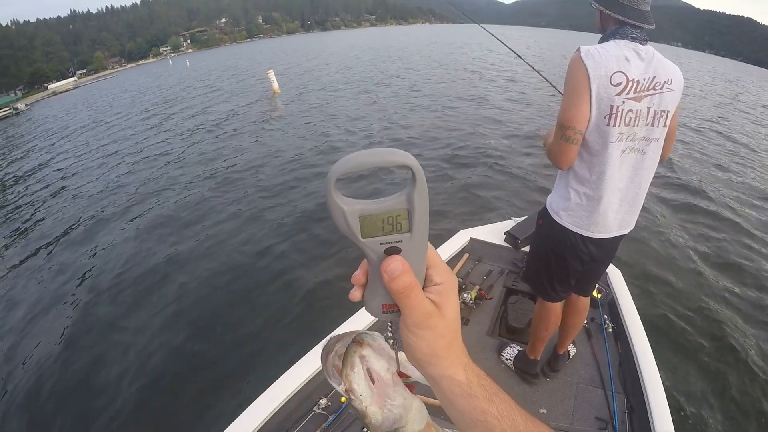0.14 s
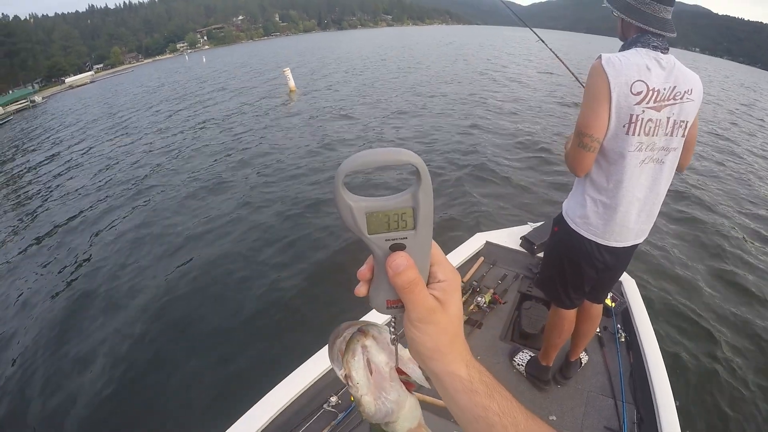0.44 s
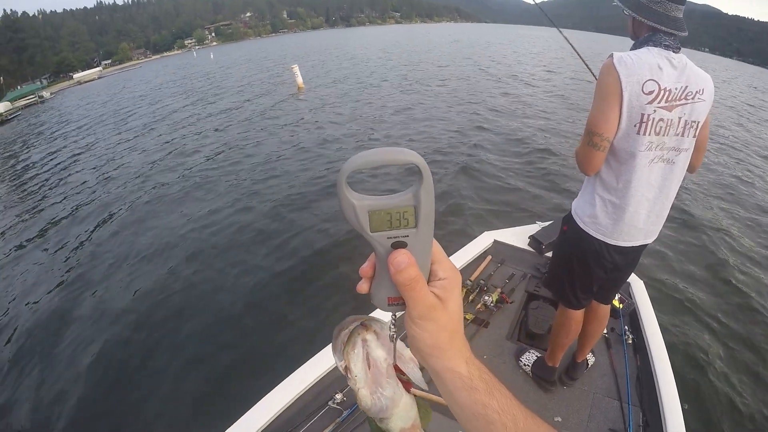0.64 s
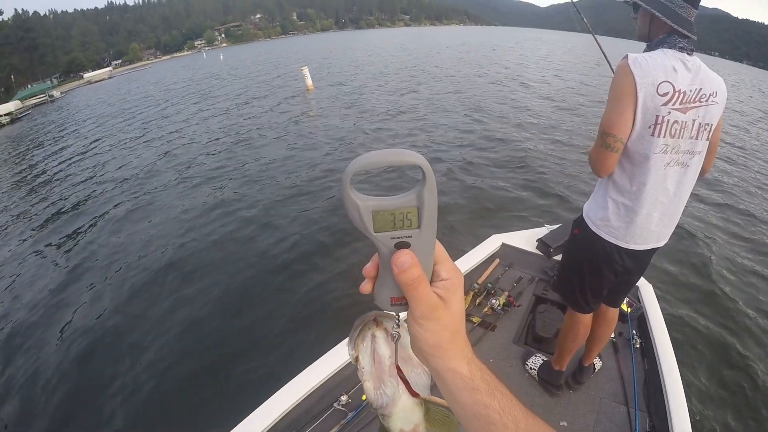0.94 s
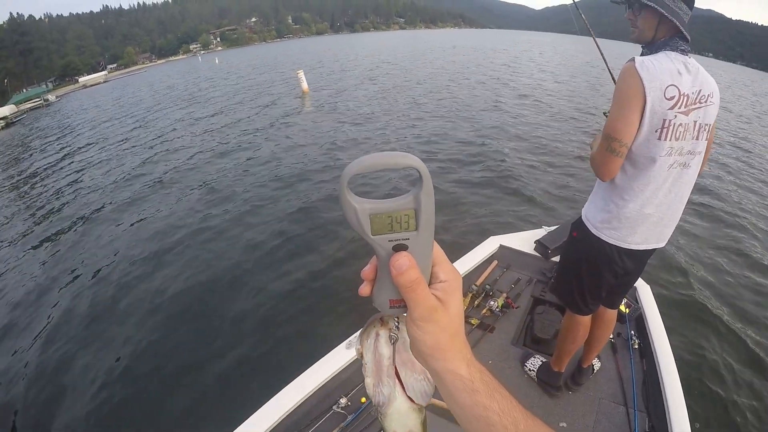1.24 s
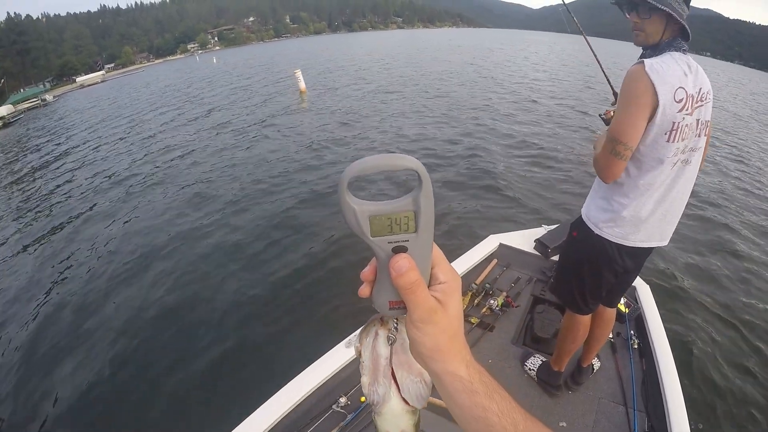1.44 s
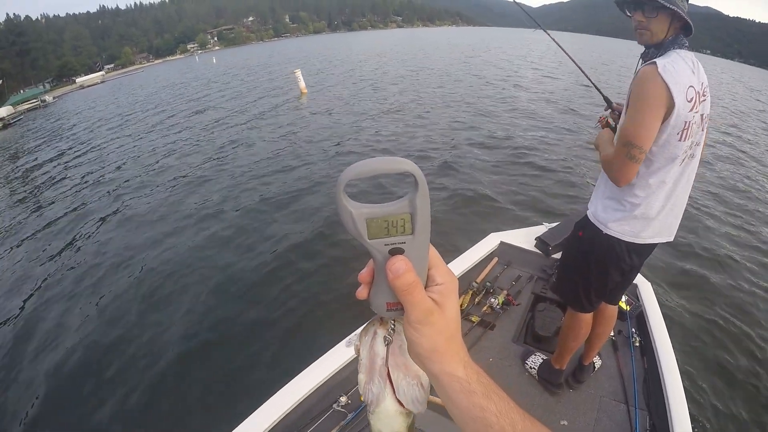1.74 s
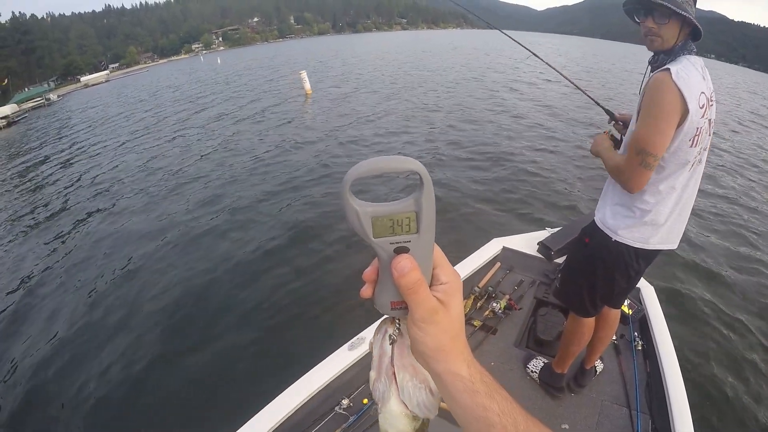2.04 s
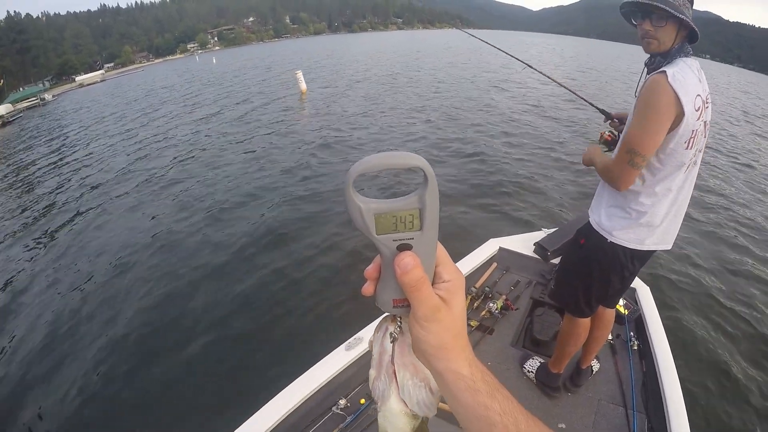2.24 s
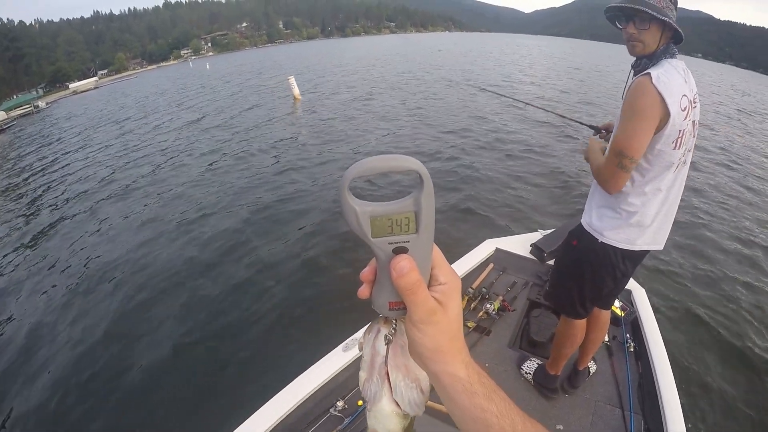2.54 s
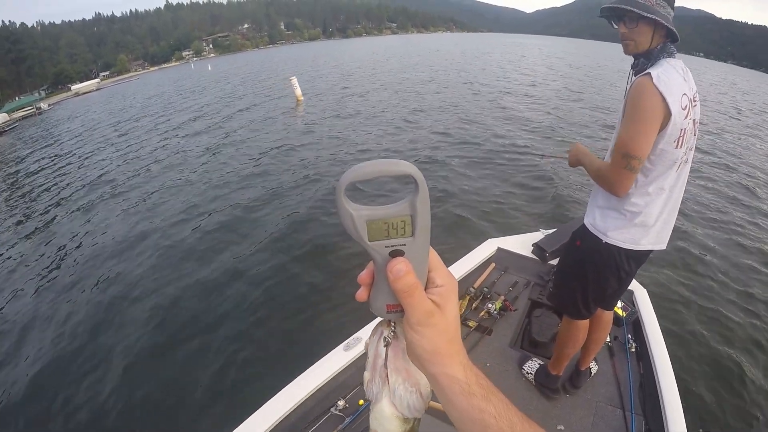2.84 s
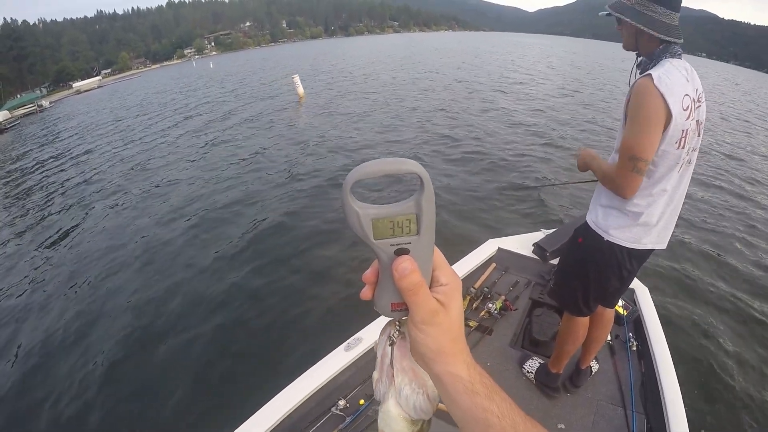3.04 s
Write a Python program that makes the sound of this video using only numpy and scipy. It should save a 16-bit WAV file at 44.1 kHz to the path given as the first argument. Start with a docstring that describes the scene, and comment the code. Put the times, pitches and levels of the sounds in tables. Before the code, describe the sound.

Low, steady boat motor hum on a lake, with water lapping against the hull.

```python
"""On a lake, in a small boat. A motor hums near 80 firings a second over a hollow, throbbing rush
and slows a little at the end; its hum comes back faintly off the shore. Close by, wavelets slap
the hull and ring short hollow notes, with small splashes and bubbles along the waterline.
Light wind rumbles on the microphone. Behind it all lie a wash of far motor noise and water,
and a thin high whine hanging in a faintly crackling hiss."""
import sys
import numpy as np
from scipy import signal
from scipy.io import wavfile
from scipy.ndimage import uniform_filter1d

SR = 44100
rng = np.random.default_rng(int(sys.argv[2]) if len(sys.argv) > 2 else 0)


def dump_mix(stems):
    """Bounce the given channels to the path in sys.argv[1] as a 16-bit WAV at rate SR."""
    frames = np.atleast_2d(stems).T  # one column per channel
    limited = np.clip(frames, -1, 1)  # hard clip at full scale
    pcm = np.round(limited * 32767).astype(np.int16)
    wavfile.write(sys.argv[1], SR, pcm)


N = 141120
T = np.arange(N) / SR

# motor speed: time_s, firing_hz
MOTOR_SPEED = [(0, 80.3), (.2, 80.64), (.45, 79.4), (.75, 79.87), (1.05, 80.74), (1.5, 80.7), (1.85, 80.76),
               (2.3, 79.94), (2.6, 79.1), (2.8, 77.1), (3.0, 74.2), (3.2, 73.3)]
# loudness of the hum's partials: time_s, lowest_two_db, third_db, higher_db
HUM_LEVELS = [(0, -50.5, -55.5, -69.5), (.2, -51, -56, -56.5), (.3, -56, -55, -62), (.7, -49.5, -47, -58),
              (.9, -56, -53, -55.5), (1.0, -47.5, -48.5, -60.5), (1.42, -50.5, -50, -54),
              (1.64, -52, -54.5, -63.5), (1.86, -46, -50.5, -52), (2.0, -59, -53, -66),
              (2.12, -46, -63.5, -58.5), (2.3, -48.5, -53, -55.5), (2.58, -54, -48.5, -58.5),
              (2.9, -49, -51.5, -58), (3.2, -49, -53, -62)]
# partials of the hum: firing_multiple, offset_db
HUM_PARTIALS = [(1, -11), (2, -1), (3, -0.5), (4, 0), (5, -4.5), (6, -4), (7, -15.5), (9, -7.5),
                (10, -14.5)]
# hollow resonances of the motor's rush: centre_hz, width_hz, level_db
RUSH_RESONANCES = [(621, 140, -54.5), (709, 84, -54.5), (759, 160, -59.5)]
# swell of the rush, which the far wash follows by half: time_s, gain_db
RUSH_SWELL = [(0, 2), (.35, 1.5), (.5, 0), (1.25, 1.5), (1.55, -1.5), (1.75, 0), (2.05, 1), (2.55, 2.5),
              (2.68, -1), (2.82, 1), (2.97, -2), (3.2, 1.5)]
# wavelets against the hull: start_s, pitch_hz, level_db, t60_s, churn_ratio, rise_s
HULL_SLAPS = [(.462, 722, -33.5, 0.074, 0.24, 0.0023), (.625, 713, -41, 0.075, .15, .003),
              (.855, 747, -34.5, 0.071, .15, .003), (.955, 730, -31, .07, 0.14, 0.0062),
              (1.08, 592, -31, .06, 0.48, 0.0055), (1.095, 438, -26, 0.053, 0.3, .005),
              (1.202, 872, -34.5, 0.13, 0.25, .002), (1.203, 614, -33, .11, .15, 0.0025),
              (1.286, 721, -32.5, 0.11, 0.14, 0.0062), (1.515, 692.6, -35, .16, 0.11, 0.016),
              (2.024, 716.3, -30.5, 0.15, 0.2, 0.016)]
# wavelets breaking: start_s, centre_hz, level_db, rise_s, t60_s
SMALL_SPLASHES = [(0.056, 1240, -46.5, .007, .083), (0.154, 1340, -47.5, 0.0058, 0.067),
                  (.33, 1700, -51, .002, 0.046), (.392, 2430, -55, 0.0044, .07),
                  (.43, 2350, -58, .005, 0.043), (.499, 2200, -50.5, 0.0023, 0.038),
                  (.658, 1200, -51, .005, .07), (.785, 1020, -46, 0.0091, 0.094),
                  (.91, 1400, -50, .004, 0.038), (.987, 930, -42, .002, 0.037),
                  (1.082, 990, -49, .003, 0.047), (1.136, 1330, -47, 0.0027, .045),
                  (1.204, 1350, -50, .002, .04), (1.28, 1350, -49, 0.0062, 0.071),
                  (1.825, 1380, -52, .01, .1), (2.355, 1401, -50, 0.016, 0.17),
                  (2.56, 1750, -51, 0.026, 0.18), (2.841, 1490, -48, .01, 0.093)]
# gusts on the microphone: time_s, rumble_db, flutter_db
MIC_GUSTS = [(0, -47, -46), (.28, -39.5, -49.5), (.42, -50.5, -48), (.68, -40.5, -48), (.95, -42, -46.5),
             (1.3, -40.5, -47), (1.62, -41.5, -55), (1.8, -40, -60), (1.94, -35, -53), (2.07, -39.5, -51),
             (2.17, -42, -43), (2.25, -29, -45.5), (2.34, -40, -48), (2.45, -43.5, -65), (2.59, -35.5, -46),
             (2.7, -43, -56), (2.81, -35, -46), (3.0, -43.5, -46.5), (3.2, -44, -46.5)]
# spectrum of the wind's rumble: frequency_hz, relative_density_db
RUMBLE_SPECTRUM = [(12, -47), (20, -39), (28, -39), (36, -43.5), (46, -39.5), (60, -44), (80, -56),
                   (120, -75)]
# spectrum of the flutter above the rumble: frequency_hz, relative_density_db
FLUTTER_SPECTRUM = [(55, -1.5), (75, 1), (100, -1), (130, -11.5), (200, -15)]
# spectrum of far motor noise and water: frequency_hz, relative_density_db
WASH_SPECTRUM = [(100, -57.5), (140, -57.5), (190, -57.5), (280, -61), (350, -62), (450, -61), (560, -67.5),
                 (850, -69), (1000, -96.5), (1200, -75), (1600, -81), (2000, -84), (2400, -83.5),
                 (3000, -105.5), (5000, -115)]
# bands of the thin whine: centre_hz, width_hz, level_db
WHINE_BANDS = [(4740, 10, -88), (4796, 54, -79.5), (4810, 530, -77), (9550, 110, -89)]
# spectrum of the background hiss: frequency_hz, relative_density_db
HISS_SPECTRUM = [(1500, -100), (3000, -94), (4300, -94.5), (5100, -92.5), (6200, -97), (7300, -100.5),
                 (10000, -101), (11800, -103.5), (13400, -102.5), (15000, -110)]


def motor():
    """The firings set the pitch of the hum and the throb of the rush; their rate wavers slightly."""
    firing_hz = in_time(MOTOR_SPEED) + .08 * drift(7.9)
    phase = 2 * np.pi * np.cumsum(firing_hz) / SR
    return shore_echo(motor_hum(phase)) + motor_rush(phase)


def motor_hum(phase, waver_db=.5):
    """Clean harmonics of the firing rate, each wavering in level on its own."""
    low_db, third_db, high_db = (in_time(HUM_LEVELS, column) for column in (1, 2, 3))
    hum = 0
    for multiple, offset_db in HUM_PARTIALS:
        group_db = low_db if multiple <= 2 else third_db if multiple == 3 else high_db
        gain = from_db(group_db + offset_db + waver_db * drift(2.5))
        hum += gain * np.sin(multiple * phase + 2 * np.pi * rng.random())
    return np.sqrt(2) * hum


def shore_echo(hum, delay_s=.31, echo_db=-13.5):
    """The direct hum plus its late return from the shore, which fades in."""
    fade_in = np.clip(T / delay_s - 1, 0, 1)
    return hum + from_db(echo_db) * fade_in * np.interp(T - delay_s, T, hum)


def motor_rush(phase, throb_depth=.2, waver_db=.5):
    """Noise pulses with the firings and sounds through hollow resonances."""
    throb = (1 + throb_depth * np.cos(phase)) * from_db(waver_db * drift(22))
    rush = sum(from_db(db) * noise_band(hz, width, 4 * width, throb) for hz, width, db in RUSH_RESONANCES)
    return from_db(in_time(RUSH_SWELL)) * rush


def hull_slaps(glide_per_s=.061, churn_width_hz=276):
    """Each wavelet rings an air pocket or a panel: a slightly rising note in churning water."""
    out = 0
    for start_s, hz, db, t60_s, churn_ratio, rise_s in HULL_SLAPS:
        age = T - start_s
        note = np.sin(2 * np.pi * hz * age * (1 + glide_per_s * age / 2))
        churn = noise_band(hz, churn_width_hz, churn_width_hz)
        out += from_db(db) * burst(start_s, rise_s, t60_s) * (note + churn_ratio * churn)
    return out


def splashes(width_hz=340):
    """Brief wet puffs where wavelets break beside the boat."""
    return sum(from_db(db) * burst(start_s, rise_s, t60_s) * noise_band(hz, width_hz, width_hz)
               for start_s, hz, db, rise_s, t60_s in SMALL_SPLASHES)


def bubbles(per_s=350, level_db=-65.5, pitch_count=18):
    """Tiny bubbles of random size ring along the waterline, the low ones loudest."""
    strength = from_db(4 * np.minimum(rng.exponential(1, N), 3))
    polarity = rng.choice([-1, 1], N)
    kicks = strength * polarity * (rng.random(N) < per_s / SR)
    pitch_index = rng.integers(0, pitch_count, N)
    rings = sum(resonate(kicks * (pitch_index == k), hz, width_hz=hz / 11.5) / hz ** 1.98
                for k, hz in enumerate(np.geomspace(800, 2600, pitch_count)))
    return from_db(level_db) * rms_one(rings)


def microphone_wind(even_s=.06, rumble_trim_db=1.5, flutter_trim_db=.5):
    """Gusts buffet the microphone: a deep rumble with a lighter flutter above it."""
    rumble = shaped_noise(RUMBLE_SPECTRUM)
    local_power = uniform_filter1d(rumble ** 2, int(even_s * SR))
    rumble = rms_one(rumble / np.sqrt(local_power + 1))  # evened, so each gust is one surge
    rumble_gain = from_db(in_time(MIC_GUSTS) + rumble_trim_db)
    flutter_gain = from_db(in_time(MIC_GUSTS, column=2) + flutter_trim_db)
    return rumble_gain * rumble + flutter_gain * shaped_noise(FLUTTER_SPECTRUM)


def far_wash(level_db=-49.5):
    """Distant motor noise and water blur together and swell gently with the rush."""
    gain = from_db(level_db + in_time(RUSH_SWELL) / 2)
    return gain * shaped_noise(WASH_SPECTRUM, flicker_db=1, flicker_hz=6.2)


def whine():
    """Thin, high bands of noise: a sharp core, a skirt around it and a faint octave."""
    return sum(from_db(db) * noise_band(hz, width, 4 * width) for hz, width, db in WHINE_BANDS)


def hiss(level_db=-69):
    """A quiet bed of treble noise that flickers slightly."""
    return from_db(level_db) * shaped_noise(HISS_SPECTRUM, flicker_db=1, flicker_hz=24.5)


def crackle(ticks_per_s=64, level_db=-69, t60_s=.006):
    """Very faint bright ticks at random moments."""
    ticks = (rng.random(N) < ticks_per_s / SR) * rng.uniform(.65, 1, N)
    decay = np.exp(-np.log(1000) / (t60_s * SR))
    envelope = signal.lfilter([1], [1, -decay], ticks + 1e-18)
    treble = rms_one(resonate(rng.standard_normal(N), hz=11500, width_hz=6000))
    return from_db(level_db) * envelope * treble


def from_db(db):
    """Decibels to gain."""
    return 10 ** (np.asarray(db) / 20)


def rms_one(x):
    """Scale to unit power."""
    return x / np.sqrt(np.mean(x ** 2) + 1e-20)


def in_time(rows, column=1):
    """Join one column of (time_s, ...) rows by straight lines."""
    columns = np.transpose(rows)
    return np.interp(T, columns[0], columns[column])


def burst(start_s, rise_s, t60_s):
    """Quick rise and exponential decay."""
    age = np.maximum(T - start_s, 0)
    return (1 - np.exp(-age / rise_s)) * np.exp(-np.log(1000) * age / t60_s)


def drift(rate_hz, step=40, settle=2000):
    """Slow random wander of spread 1, drawn once every step samples."""
    pole = np.exp(-2 * np.pi * rate_hz * step / SR)
    white = rng.standard_normal(N // step + settle + 2)
    slow = signal.lfilter([1], [1, -2 * pole, pole ** 2], white)[settle:]
    return np.interp(np.arange(N) / step, np.arange(len(slow)), rms_one(slow - slow.mean()))


def resonate(x, hz, width_hz):
    """Two-pole resonance with gain 1 at its peak."""
    radius = np.exp(-np.pi * width_hz / SR)
    feedback = [1, -2 * radius * np.cos(2 * np.pi * hz / SR), radius ** 2]
    return signal.lfilter(np.array([1, 0, -1]) * (1 - radius ** 2) / 2, feedback, x + 1e-18)


def noise_band(hz, width_hz, skirt_hz, drive=1):
    """Unit-power noise through a resonance, with a second one to trim its skirts."""
    band = resonate(drive * rng.standard_normal(N), hz, width_hz)
    return rms_one(resonate(band, hz, skirt_hz))


def shaped_noise(spectrum, flicker_db=0, flicker_hz=9):
    """Unit-power noise in third-octave bands, each with its own level and optional flicker."""
    hz, db = np.transpose(spectrum)
    edges = 12 * 2 ** (np.arange(33) / 3)
    white = rng.standard_normal((2, N + SR // 2))
    shared_flicker = drift(flicker_hz / 2) / 2
    out = 0
    for k, (low, high) in enumerate(zip(edges, edges[1:])):
        centre = np.sqrt(low * high)
        octaves_outside = abs(np.log2(centre / np.clip(centre, hz[0], hz[-1])))
        level_db = np.interp(np.log(centre), np.log(hz), db) - 24 * octaves_outside
        bandpass = signal.butter(2, [low, high], "band", fs=SR, output="sos")
        band = signal.sosfilt(bandpass, white[k % 2])[-N:]
        out += band * from_db(level_db + flicker_db * (shared_flicker + drift(flicker_hz)))
    return rms_one(out)


def scene():
    """Motor, water and air, heard at one microphone in the boat."""
    background = far_wash() + microphone_wind() + hiss() + crackle()
    return (motor() + whine() + hull_slaps() + splashes() + bubbles() + background)[None]


def record(dry, fade_s=.004, cutoff_hz=15150):
    """The ends are eased and the top is cut steeply."""
    fade = np.minimum(1, np.minimum(T, T[::-1]) / fade_s)
    lowpass = signal.ellip(12, .1, 80, cutoff_hz, fs=SR, output="sos")
    return signal.sosfilt(lowpass, dry * fade)


dry = scene()
out = record(dry)
dump_mix(out)
```